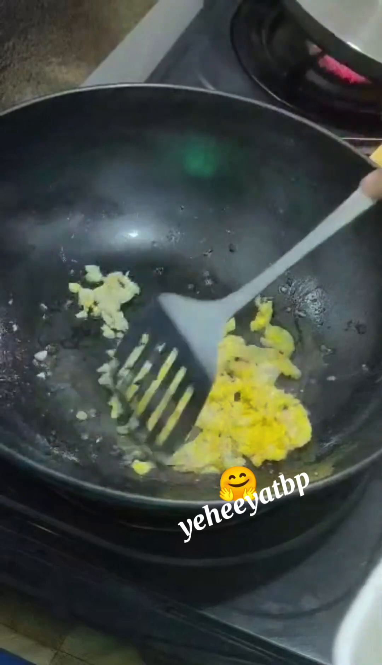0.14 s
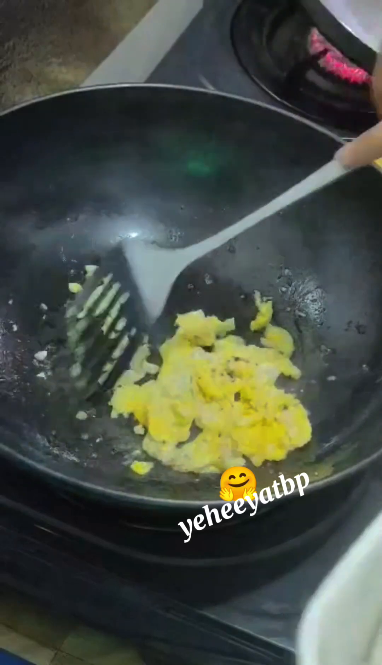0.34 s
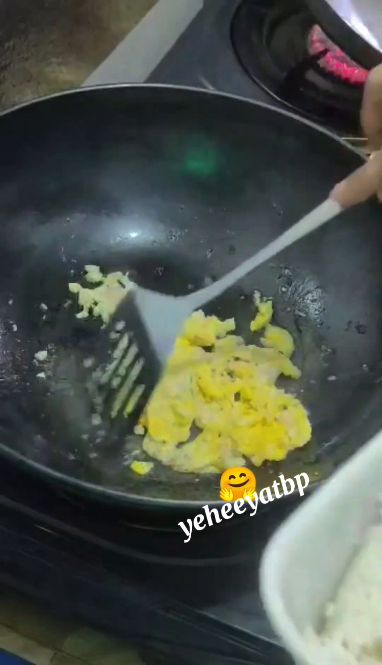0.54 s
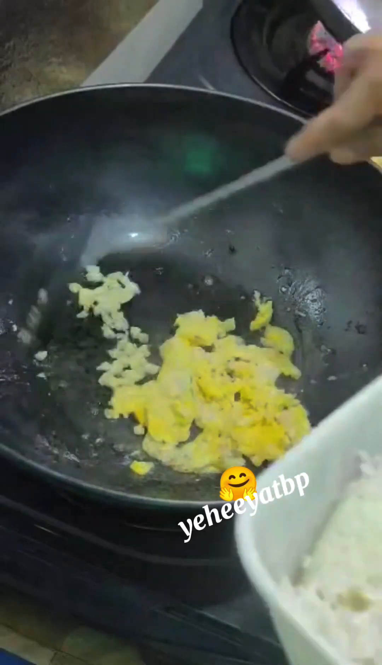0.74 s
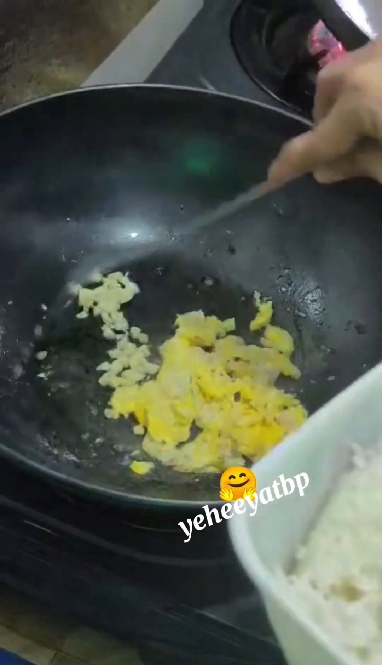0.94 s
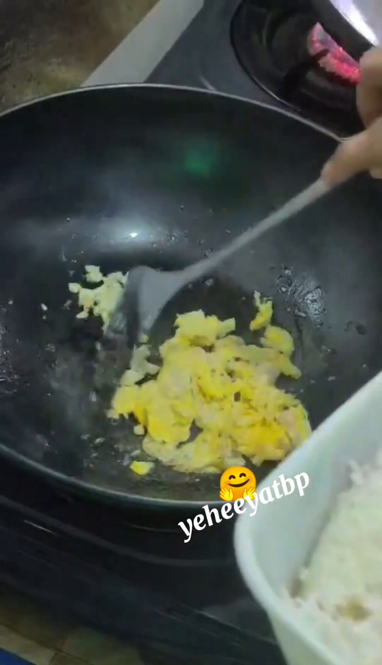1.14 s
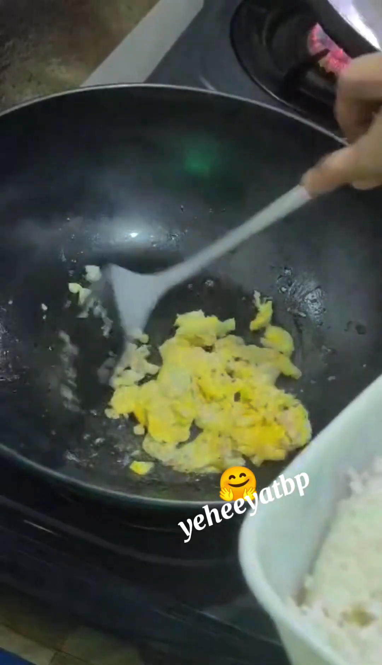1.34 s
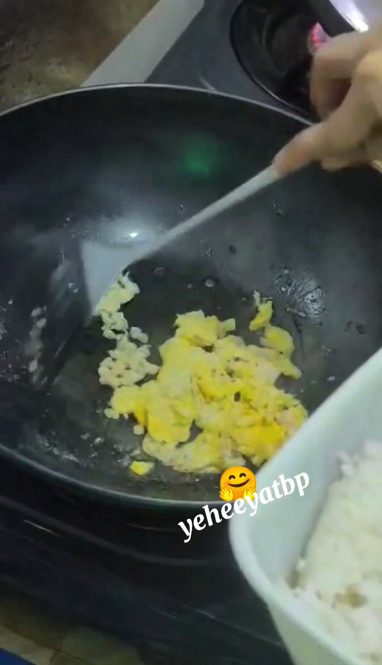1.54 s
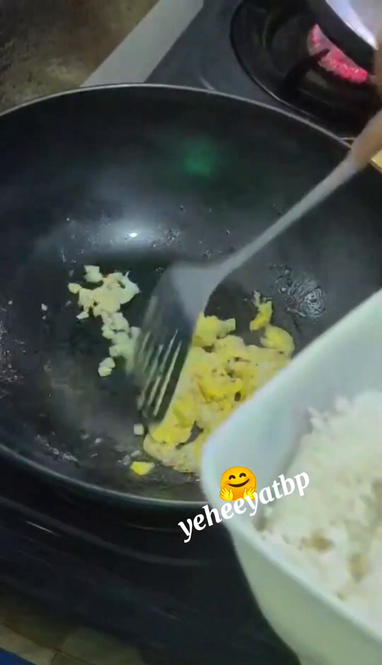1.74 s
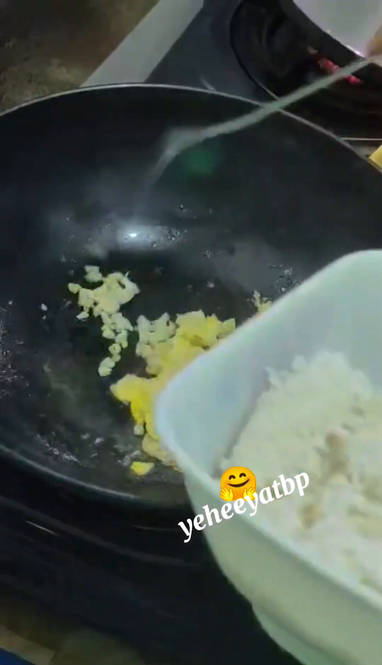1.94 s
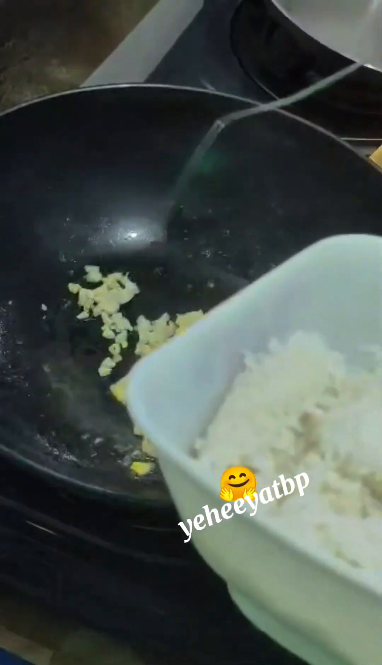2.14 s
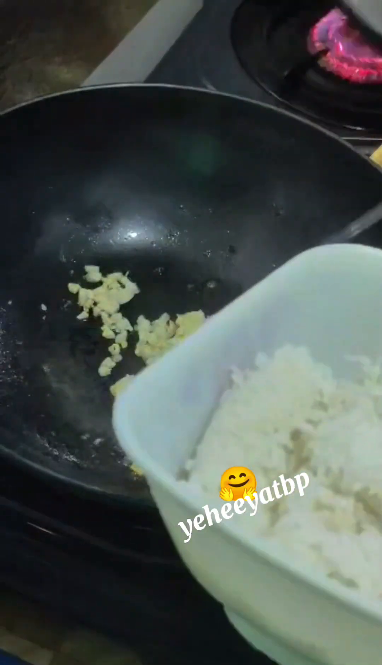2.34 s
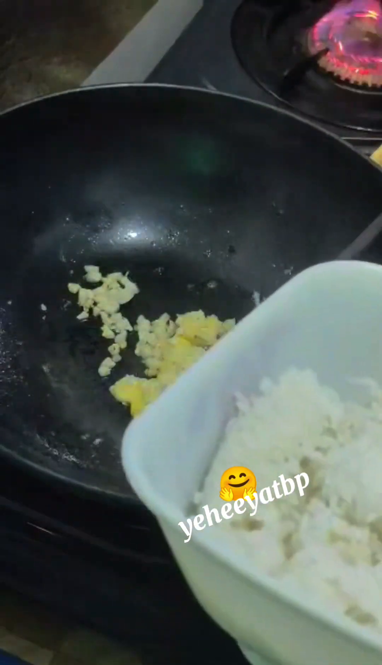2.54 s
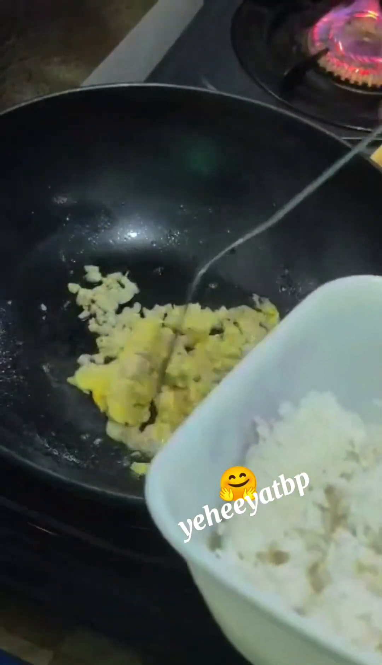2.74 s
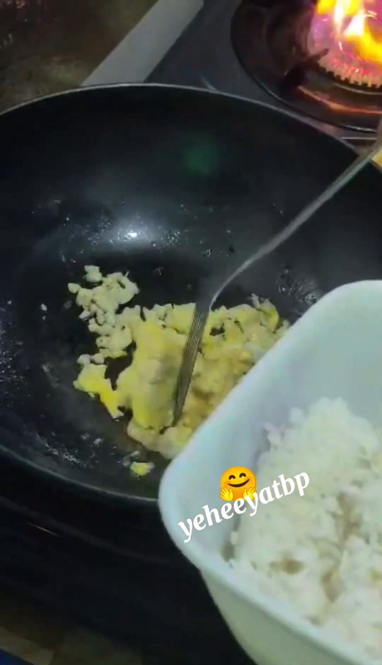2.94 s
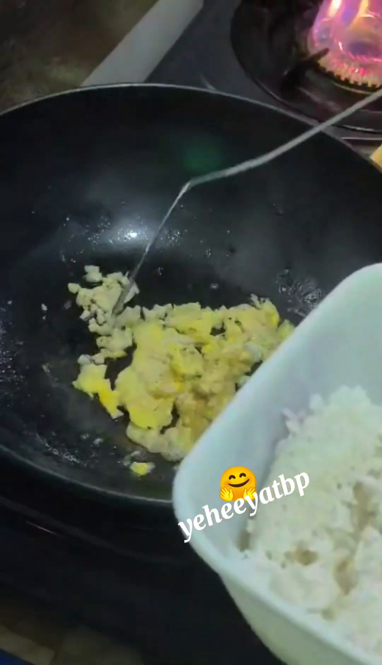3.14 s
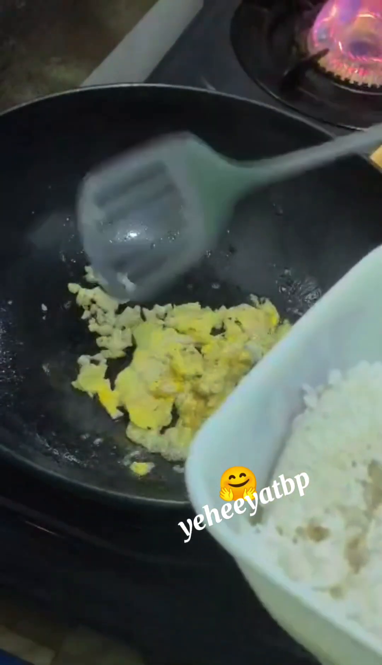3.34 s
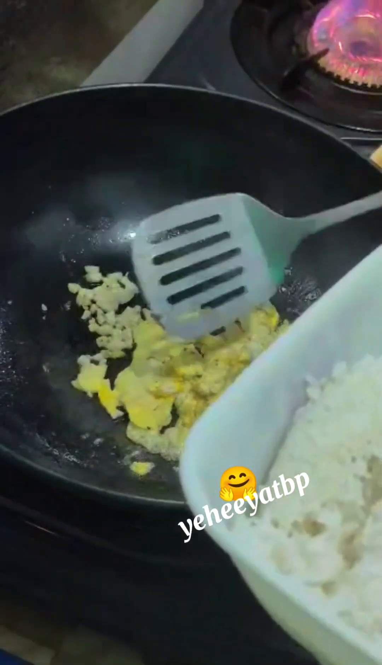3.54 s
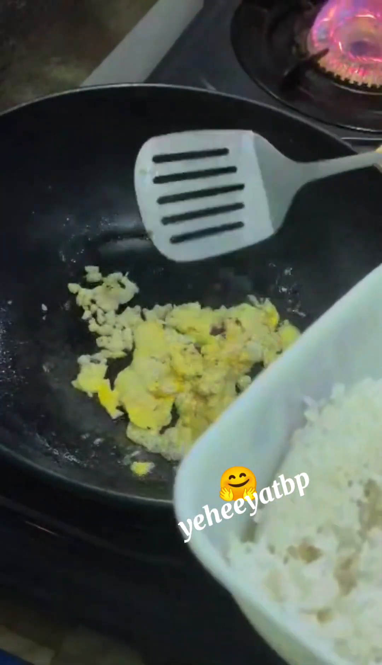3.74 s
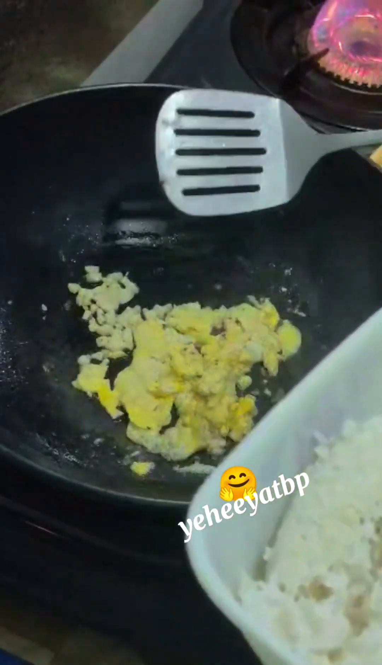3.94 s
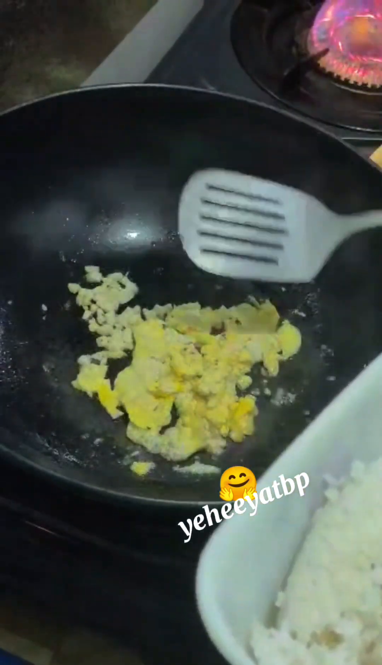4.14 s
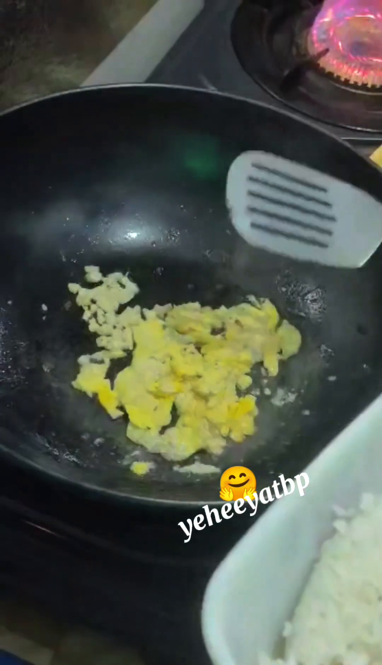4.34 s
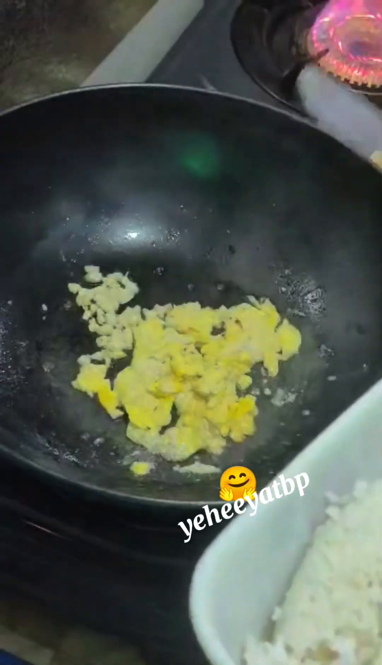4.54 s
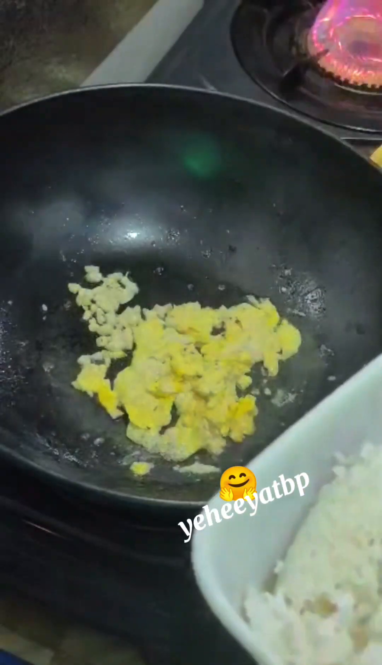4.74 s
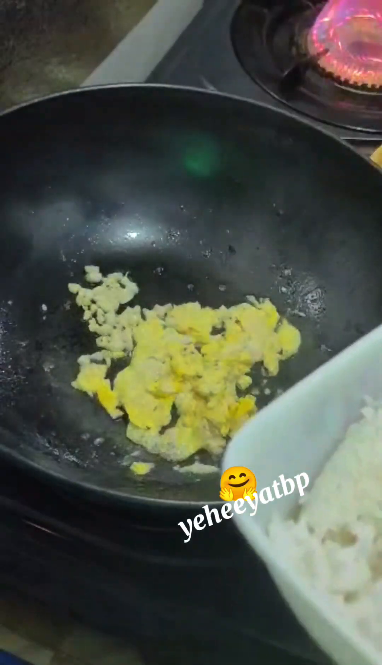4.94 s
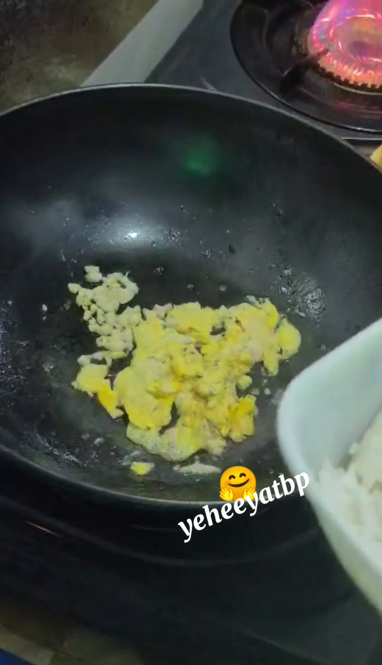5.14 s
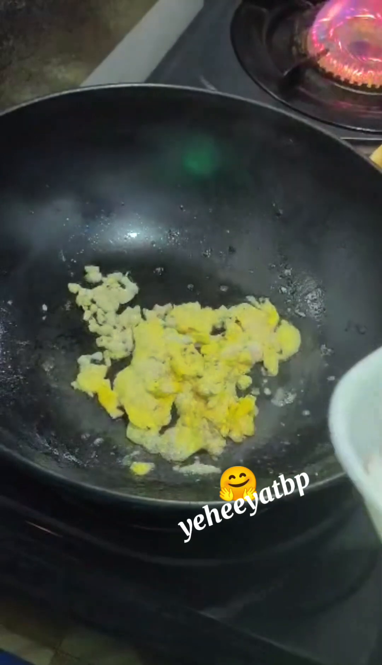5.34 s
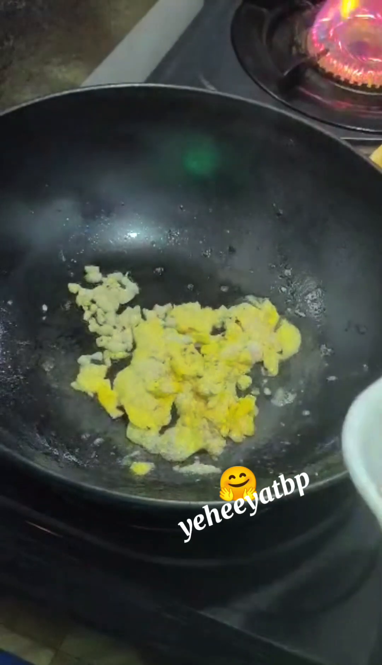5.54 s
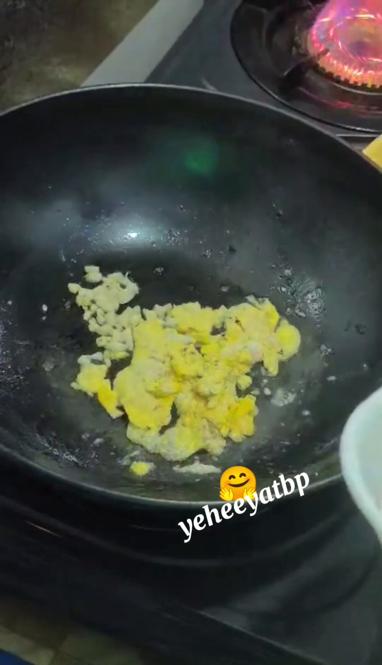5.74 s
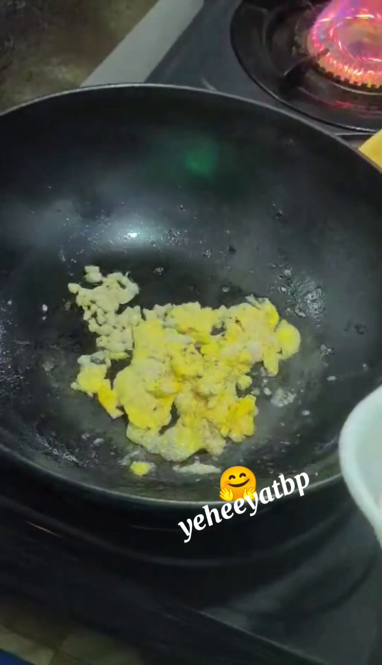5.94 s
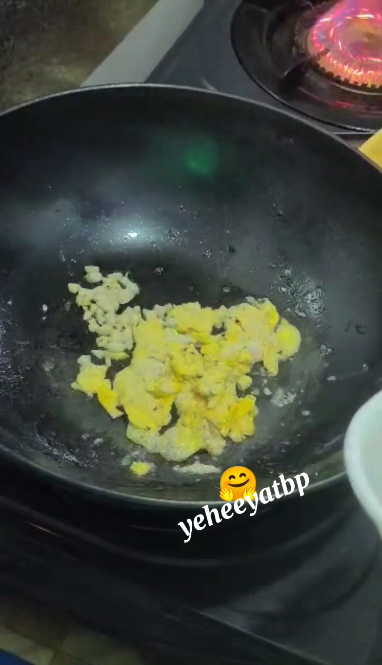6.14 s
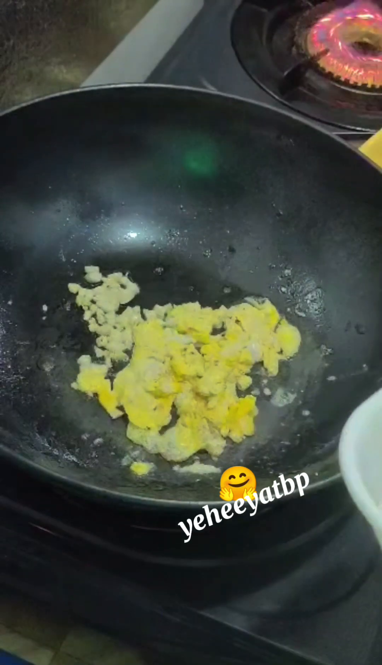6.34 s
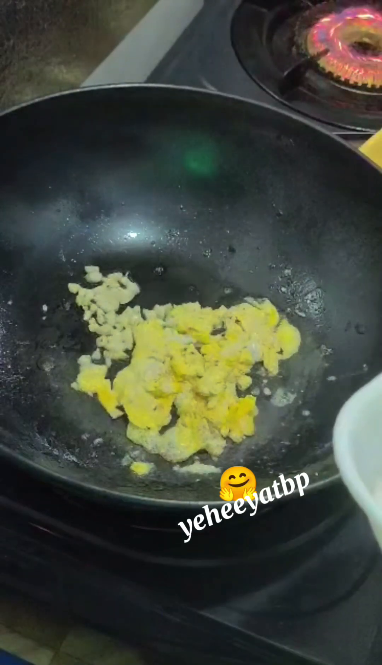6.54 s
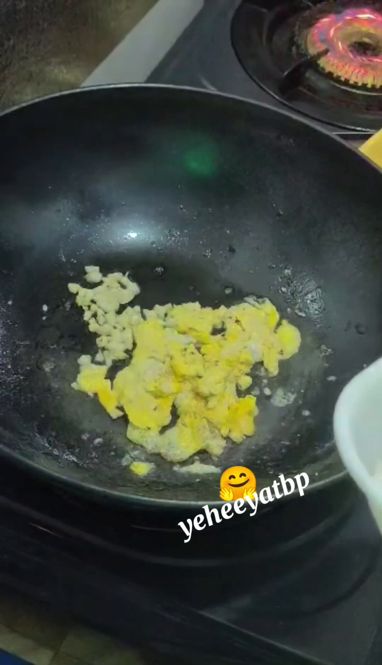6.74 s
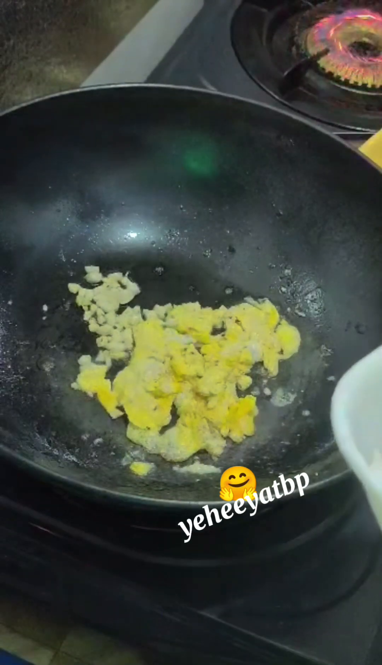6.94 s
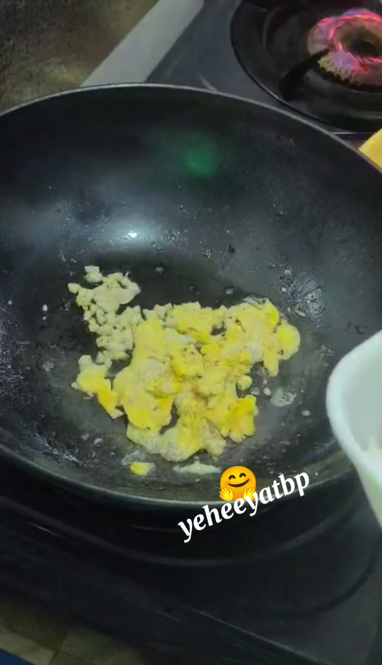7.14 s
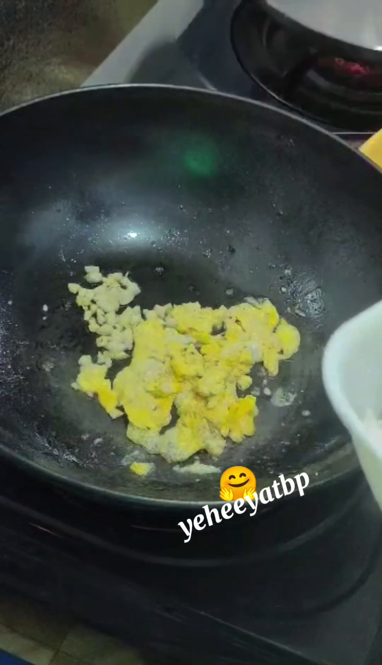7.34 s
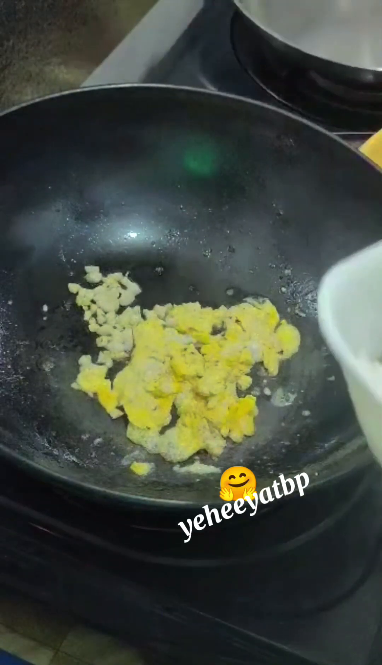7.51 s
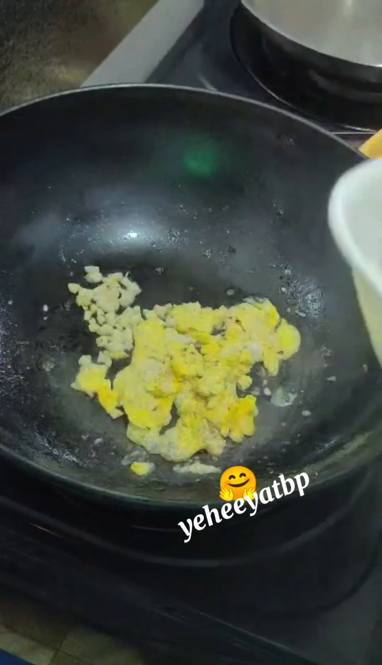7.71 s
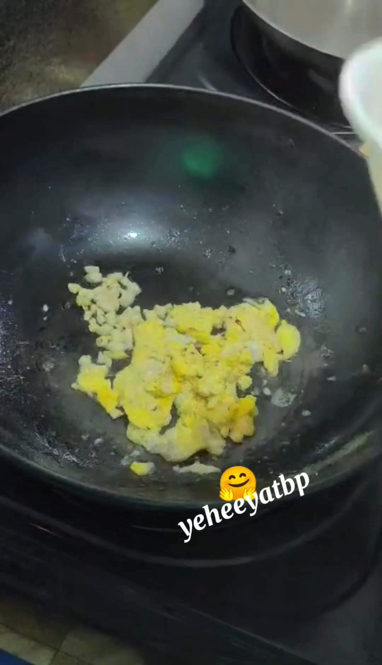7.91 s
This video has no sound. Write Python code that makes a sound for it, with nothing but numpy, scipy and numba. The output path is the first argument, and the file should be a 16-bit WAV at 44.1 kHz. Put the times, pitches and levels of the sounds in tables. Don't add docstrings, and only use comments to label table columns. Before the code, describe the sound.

Irregular metallic blows and scratchy taps in a wok, with frying hiss rising after each knock. After a pause comes a heavy cluster of chops in egg, then tiny brittle cracks with little ringing. A plastic tub is rapped, dragged against and rubbed by jerking fingers with low thumps, ending in quick loud clanks. Dry, close phone sound in a kitchen, background gated and slightly watery.

```python
import sys
import numpy as np
from scipy import signal
from scipy.fft import rfft, irfft
from scipy.io import wavfile
from scipy.ndimage import uniform_filter1d
from numba import njit

SR = 44100
rng = np.random.default_rng(int(sys.argv[2]) if len(sys.argv) > 2 else 0)


def bounce(signal):
    frames = np.transpose(np.atleast_2d(signal))
    limited = np.clip(frames, -1, 1)
    pcm = np.round(limited * 32767).astype(np.int16)
    wavfile.write(sys.argv[1], SR, pcm)


def undo_db(level):
    steps = np.asarray(level, float) / 20
    return 10 ** steps


N = 351469

# pitch_hz, level_db, t60_s
BODY = [(272.5, -12.5, 0.14), (416, -5, 0.083), (445.4, -8.5, 0.36), (520.3, 2, 0.11), (608, -2.5, 0.1),
        (696, -22, 0.045), (757, -14, 0.18), (854, -12.5, 0.16), (1054, -10, 0.19), (1119, -7.5, 0.13)]
# pitch_hz, level_db, t60_s
CLANG = [(1260, -16, 0.15), (1555, -8.5, 0.19), (1965, 5.5, 0.66), (2094, -7, 0.24), (2420, 0, 0.075),
         (2500, -3, 0.21), (3020, -6.5, 0.27), (3660, -11, 0.36), (3635, 13.5, .22), (3734, 5.5, 0.33)]
# pitch_hz, level_db, t60_s
EDGE = [(4410, 5.5, 0.034), (4330, -12.5, 0.19), (4660, -19.5, 0.019), (6376, 2.5, 0.15), (7020, 4, 0.28),
        (7904, -10, 0.15), (7420, -5, 0.25), (7360, 8.5, 0.42), (7540, -13.5, 0.077), (9860, -4.5, 0.076)]
# modes, dense_low_hz, dense_high_hz, dense_level_db, dense_t60_s, unlikeness of the ports
PARTS = ((BODY, 310, 2000, -1.5, 0.36, 1), (CLANG, 1246, 4410, 8.4, 0.19, 1),
         (EDGE, 5250, 9040, 1.2, 0.14, 3.5))
# pitch_hz, density_db (per Hz)
OIL_SPECTRUM = [(530, -46), (900, -7.5), (1340, -14), (1780, 1), (2150, -5), (2470, 3), (2960, 0.5),
                (4300, 2), (5090, -8), (5970, 0.5), (7660, 7), (9610, 1), (11000, -0.5), (12800, 2),
                (13500, -18)]
# pitch_hz, width_hz, level_db
SIMMER_PEAKS = [(534, 73, 9), (610, 27, -6), (1136, 220, -9.5)]
# pitch_hz, width_hz, level_db
TUB_PEAKS = [(160.2, 21, 5.5), (250, 40, 5.5), (300.5, 53, 0.5), (419.5, 330, -19), (760, 370, -31)]
# pitch_hz, width_hz, level_db
DRAG_PEAKS = [(490, 20, -10), (510, 87, 0.5), (1025, 90, -2.5), (1063, 50, 3.5), (1860, 70, -8),
              (2530, 120, -9.5), (3060, 160, -7)]
# time_s, sizzle_db (oil), spit_db (wet egg)
HEAT = [(0, -59, -60), (.3, -50.5, -59.5), (1.3, -52, -65), (2.02, -50.5, -64), (2.1, -63.5, -81.5),
        (2.515, -53, -76.5), (2.57, -47, -58), (3.3, -49.5, -58.5), (3.75, -48.5, -57.5),
        (4.05, -52, -68.5), (4.22, -50.5, -59), (4.57, -55, -70), (4.8, -62.5, -72), (5.235, -56, -70.5),
        (5.32, -46.5, -56), (5.63, -65.5, -72.5), (6.5, -60.5, -72), (7.55, -62.5, -78)]
# start_s, hold_s, rumble_db, thud_db
GRIPS = [(0.093, 0.11, -47.5, -76), (0.584, 0.057, -55, -56), (0.858, 0.034, -81, -47),
         (1.03, 0.042, -56.5, -80), (1.23, 0.57, -73, -78), (2.025, 0.042, -63, -80.5),
         (2.687, 0.049, -68.5, -95), (2.93, 0.035, -51.5, -56.5), (3.67, 0.02, -91.5, -66.5),
         (4.041, 0.034, -57, -62), (4.36, 0.041, -80, -52.5), (5.304, 0.087, -52, -44.5),
         (5.816, 0.068, -62, -88), (6.466, 0.33, -63, -67), (6.932, 0.26, -60.5, -60),
         (7.274, 0.13, -58.5, -64), (7.487, 0.02, -83, -70), (7.623, 0.16, -41.5, -50.5),
         (7.78, .3, -63, -69)]
# start_s, peak_db
SLIPS = [(6.456, -47), (6.525, -42), (6.569, -52), (6.619, -41.5), (6.679, -49), (6.723, -43), (6.769, -49),
         (6.826, -42), (6.869, -44), (6.919, -48), (6.961, -38.5), (7.004, -42), (7.05, -55),
         (7.097, -35.5), (7.193, -40), (7.272, -40), (7.349, -48), (7.419, -44.5), (7.491, -33.5)]
# start_s, hold_s, level_db
DRAGS = [
    (4.858, .045, -63),
    (5.886, 0.01, -65),
    (6, 0.2, -56),
    (6.3, .015, -51.5),
]
# start_s, pitch_hz, level_db, t60_s
HUMS = [(0.069, 285, -47, 1.9), (0.069, 460, -37, .28), (0.069, 1149, -27.5, 0.14), (0.071, 1304, -34, .15),
        (0.076, 517, -34, 0.22), (.548, 544, -30, 0.19), (0.546, 300, -34.5, 0.26),
        (0.699, 1300, -33, 0.083), (0.872, 272, -37.5, 0.39), (.87, 546, -36.5, 0.19),
        (.87, 590, -45.5, .9), (0.969, 429, -37.5, 0.37), (1.25, 850, -47.5, 0.3), (1.36, 619, -53, 0.69),
        (2.003, 580, -54, 0.19), (2.173, 606, -46, 0.22), (2.173, 730, -58, 0.18), (5.06, 640, -57, 0.29),
        (2.53, 263.5, -46.5, 0.9), (2.935, 409, -18.5, 0.35), (2.97, 603, -28.5, 0.2),
        (2.935, 711, -33.5, 0.25), (2.94, 775, -28.5, 0.3), (2.94, 1060, -31, .3), (.548, 2254, -28, 0.22),
        (.548, 2373, -30, .15), (.548, 3732, -23.5, 0.18), (.868, 4456, -24.5, 0.12),
        (.07, 3785, -31, 0.15), (2.94, 1475, -32.5, 0.24), (.868, 4720, -27, 0.11), (.868, 3800, -28, .1),
        (3.335, 840, -52, 0.13), (6.0, 1060, -47, 0.22), (6.05, 1090, -45, 0.23), (6.05, 490, -45, 0.23),
        (6.29, 1050, -51, .15), (0.369, 1080, -47, 0.086), (7.787, 2020, -31, .12), (7.787, 3550, -33, .15),
        (7.652, 3800, -30, .15), (6.68, 1260, -53.5, 0.11), (6.1, 1800, -46.5, 0.1),
        (6.68, 2116, -56, 0.15), (6.689, 453, -58, 0.26)]
# start_s, peak_db
TICKS = [(.0152, -31), (.524, -28), (1.441, -27), (1.603, -32), (5.371, -36), (6.432, -38), (6.551, -38),
         (6.926, -36), (.375, -32), (.403, -31), (.4094, -28), (1.1343, -30), (1.486, -22), (1.5554, -25),
         (1.569, -23), (1.7963, -20), (1.811, -30), (1.619, -31), (1.197, -36), (1.208, -36), (1.8427, -22),
         (1.992, -34), (5.7195, -26), (5.8112, -30), (1.8194, -33), (2.6544, -22), (5.247, -28),
         (6.3395, -33), (6.3674, -26), (6.4911, -25), (6.521, -26), (6.9075, -35), (6.982, -33),
         (6.987, -36), (7.476, -35), (7.481, -37)]
# start_s, peak_db
CRUMBS = [(2.359, -38), (3.4506, -27), (3.469, -26), (3.3332, -35), (3.5314, -28), (3.5362, -23),
          (3.5623, -27), (3.6579, -32), (3.785, -34), (3.8851, -25), (3.8994, -27), (3.9818, -29),
          (4.1131, -20), (4.1174, -23), (4.1869, -31), (4.1907, -28), (4.2277, -30), (4.2312, -31),
          (3.8386, -33), (4.2145, -34), (4.7595, -37), (4.243, -33), (4.2575, -27), (4.309, -25),
          (4.3609, -32), (4.4931, -36), (4.5321, -32), (4.0476, -35), (4.7066, -39)]
# start_s, peak_db
SNAPS = [
    (.0677, -11),
    (5.7195, -22),
    (5.7245, -26),
    (5.8112, -27),
    (2.5282, -22),
    (5.289, -31),
]
# start_s, clang_peak_db, body_db, edge_db, contact_ms
BLOWS = [(0.067, -16.5, -18, -17, 24), (0.135, -30.5, -37, -32, 30.5), (.545, -9.5, -21, -8.5, 21.7),
         (0.696, -34, -42, -33.5, 7.2), (0.8652, -15, -16, -14, 14.3), (.952, -31, -36.5, -27, 27),
         (.975, -27.5, -29, -22, 18), (1.239, -42.5, -48.5, -48, 62), (1.427, -29.5, -39.5, -30.5, 27.8),
         (1.617, -43, -37.5, -41, 15.3), (2.0031, -55, -53.5, -38.5, 26), (2.358, -62.5, -82, -44.5, 30),
         (2.527, -30, -25.5, -21, 27.3), (2.5851, -20.5, -27.5, -19.5, 32.6), (2.6185, -27, -45, -16, 10.2)]
# start_s, clang_peak_db, body_db, edge_db, contact_ms
CHOPS = [
    (2.9248, -14, -17.5, -25.5, 25),
    (2.947, -25.5, -20.5, -30, 26.7),
    (2.999, -28.5, -25.5, -29.5, 26),
    (3.0816, -25.5, -38.5, -28.5, 25.5),
    (3.8374, -32, -48, -40, 24),
]
# start_s, clang_peak_db, body_db, edge_db, contact_ms
RAPS = [(5.2443, -30.5, -34, -24.5, 2.7), (5.662, -38, -40, -35, 10), (5.678, -36, -44.5, -35, 15),
        (5.7185, -31, -37.5, -27.5, 4), (5.809, -36, -41, -35, 6.3), (5.863, -27.5, -32.5, -38.5, 15),
        (6.012, -39, -40, -86, 22), (7.614, -30, -20.5, -46, 7.4), (7.631, -32.5, -22, -44, 4.5),
        (7.651, -15.5, -23, -17, 16), (7.7414, -38.5, -27.5, -37, 5.1), (7.787, -19.5, -24.5, -21.5, 4.7),
        (7.696, -27, -32, -27, 8), (7.811, -27.5, -37, -25.5, 6), (7.829, -29, -36, -28, 12),
        (7.838, -20, -31, -22, 8.3)]
# start_s, clang_peak_db, edge_db, contact_ms
TAPS = [(0.0112, -34.5, -32.5, 19), (0.347, -62, -38, 60), (0.409, -30.5, -30.5, 27.7),
        (0.513, -24, -25, 17), (0.7232, -36, -37, 4.2), (0.826, -27.5, -41, 24), (1.121, -72, -33.5, 6.4),
        (1.487, -27.5, -25.5, 9.5), (1.556, -25, -25, 29), (1.801, -35, -32, 27), (1.853, -28, -26, 16.6),
        (.462, -39, -45, 15), (3.222, -41, -46, 12), (3.335, -45, -46, 12), (7.606, -46, -43, 5),
        (7.918, -44, -36, 6), (1.843, -22.5, -21.5, 4.3), (2.6532, -44, -36, 57), (2.706, -26, -28, 29.2),
        (3.4474, -33.5, -32.5, 10), (3.531, -32, -34, 5.4), (3.8807, -34, -36, 20), (4.112, -78, -38, 13),
        (4.244, -60, -32.5, 19), (4.304, -39.5, -39.5, 27), (4.36, -68, -40.5, 23),
        (4.5352, -50, -42.5, 10), (4.741, -39, -40.5, 35), (5.459, -39, -36, 44), (6.183, -44, -41.5, 29),
        (6.366, -40.5, -34.5, 30), (6.4902, -28.5, -31, 27.4), (6.8641, -41.5, -39.5, 12),
        (6.981, -75, -40, 11), (7.28, -41.5, -39, 28), (7.473, -60, -38.5, 28.5)]
# start_s, body_db, clang_db (relative to body), contact_ms
BUMPS = [
    (1.6783, -39.5, -34, 16.2),
    (2.171, -44, -30, 32),
    (4.034, -43.5, -13, 1.7),
    (5.067, -49, -12, 26.6),
    (6.061, -41.5, -26, 10.6),
    (6.308, -57, 8, 39),
    (6.678, -53.5, -2.5, 40),
]
# pitch_hz, level_db
GATE = [(0, -30), (700, -7), (1300, 0), (4200, 0), (4800, 2), (5150, 8), (5500, 1), (6000, -2), (7500, -6),
        (9000, 1), (10600, 9), (12000, 7)]

LEFT_LAG, TUB_LAG = 16, 1
TUB_FROM_S = 5.6
TOP_HZ = 13200


def level(x):
    return x / np.sqrt(np.mean(x ** 2) + 1e-30)


def curves(table):
    s, *columns = np.transpose(table)
    return [np.interp(np.arange(N) / SR, s, c) for c in columns]


def walk(rate):
    k = int(SR / rate)
    held = np.repeat(rng.standard_normal(int(100 * N / SR)), k)[:N]
    return 1.31 * uniform_filter1d(uniform_filter1d(held, k), k)


def grit(n, spike_db):
    spikes = np.minimum(rng.exponential(size=n), 7)
    return level(rng.standard_normal(n) * undo_db(spike_db * spikes))


def ports(n, unlike, lag):
    shared = rng.standard_normal(n)
    return np.array([np.roll(shared, int(lag)), shared]) + unlike * rng.standard_normal((2, n))


def strokes(start, hold, db, rise_db_s, fall_db_s, rest_db):
    t, out = np.arange(0, N + 64, 64) / SR, 0
    for s, h, d in zip(start, hold, db):
        before, after = np.maximum(s - t, 0), np.maximum(t - s - h, 0)
        out = out + undo_db(d - rise_db_s * before - fall_db_s * after)
    return np.interp(np.arange(N) / SR, t, 20 * np.log10(out + undo_db(rest_db)))


def opened(rest_db, start, knock_db, rise_s, slope, top_db):
    t = np.arange(0, N + 64, 64) / SR
    age = np.maximum(t - start[:, None], 0) / rise_s
    peak = undo_db(top_db + slope * (knock_db[:, None] + 19))
    swell = np.max(peak * (age * np.exp(1 - age)) ** 2, axis=0)
    return 20 * np.log10(undo_db(rest_db) + np.interp(np.arange(N) / SR, t, swell))


@njit
def svf(x, hz, width):
    y, b, l = np.empty(len(x)), 0., 0.
    g, k = np.tan(np.pi * hz / SR), width / hz
    for i in range(len(x)):
        v = (b + g * (x[i] - l)) / (1 + g * (g + k))
        b, l, y[i] = 2 * v - b, l + 2 * g * v, k * v
    return y


def walls(force, peaks):
    out = 0
    for hz, width, db in peaks:
        hz, width = float(hz), float(width)
        out = out + undo_db(db) * np.array([svf(svf(c, hz, width), hz, 2 * width) for c in force])
    return level(out)


@njit
def ring(x, pole, left, right):
    out, z = np.zeros((2, len(x))), np.zeros(len(pole), np.complex128)
    for i in range(len(x)):
        for k in range(len(pole)):
            z[k] = z[k] * pole[k] + x[i]
            out[0, i] += (left[k] * z[k]).imag
            out[1, i] += (right[k] * z[k]).imag
    return out


def struck(force, modes, share, unlike, lag, spot_db=3):
    hz, db, t60 = np.transpose(modes)
    t60 = share * np.minimum(t60, np.interp(hz, (1000, 1300, 8000), (.45, .22, .11)))
    spot = rng.standard_normal((4, len(hz)))
    detuned = hz * (1 + np.where(hz > 3000, .015, .004) * spot[0])
    pole = np.exp(2j * np.pi * detuned / SR - np.log(1000) / (t60 * SR))
    right = undo_db(np.minimum(db, 0) + spot_db * spot[1]) * np.exp(2j * spot[2])
    scatter = unlike * np.minimum(hz / 700, 1) * spot[3]
    left = right * np.exp(-2j * np.pi * hz * lag / SR + 1j * scatter)
    return ring(force + 1e-18, pole, left, right)


def frying(sizzle_db, crackle_db):
    hz_table, db_table = np.transpose(OIL_SPECTRUM)
    pops = np.clip(grit(N, 7), -9, 9) * undo_db(3 * walk(90))
    near = np.array([np.roll(pops, LEFT_LAG), pops])
    crackle, sizzle = 0, 0
    swell = np.clip(.4 * walk(22) + .8 * walk(70), -2, .9)
    for hz in 1000 * 2 ** np.arange(0, 3.75, .2):
        both = 0.77 * near + rng.standard_normal((2, N))
        band = np.array([svf(svf(c, hz, hz / 5), hz, hz / 5) for c in both])
        db = np.interp(np.log(hz), np.log(hz_table), db_table)
        db = db + (2.6 if hz < 9000 else 3.2) * swell + 2.3 * np.clip(walk(25), -3, 1.6)
        lean = 3 * np.clip((hz - 9000) / 3000, -.5, 1)
        band = band * undo_db(db + np.array([[lean], [-lean]]))
        if hz > 4500:
            sizzle = sizzle + band
        else:
            crackle = crackle + band
    top = signal.ellip(8, .2, 60, TOP_HZ, fs=SR, output="sos")
    return signal.sosfilt(top, level(crackle) * undo_db(crackle_db) + level(sizzle) * undo_db(sizzle_db))


def simmering(spit_db):
    bubbles = ports(N, .6, 0) * undo_db(4.5 * walk(30))
    return walls(bubbles, SIMMER_PEAKS) * undo_db(-74 + 0.94 * (spit_db + 53.0))


def rubbing(rub_db):
    force = grit(N, 2) * undo_db(3 * walk(20))
    return level(struck(force, BODY[1:], 0.11, 1.0, 0, spot_db=-2.5)) * undo_db(rub_db)


def tub(rumble_db, thud_db):
    s, db = np.transpose(SLIPS)
    hold_s = np.full(len(s), 0.0054)
    slip_db = strokes(s + 0.0061, hold_s, db - 9, rise_db_s=1201, fall_db_s=421, rest_db=-120)
    slips = ports(N, .25, 0) * undo_db(1.5 * walk(40))
    low = signal.butter(2, (30, 95), "band", fs=SR, output="sos")
    thud = signal.sosfilt(low, ports(N, .4, 0))
    return walls(slips, TUB_PEAKS) * (undo_db(rumble_db) + undo_db(slip_db)) + level(thud) * undo_db(thud_db - 8.0)


def dragging():
    stroke_db = strokes(*np.transpose(DRAGS), rise_db_s=308, fall_db_s=259, rest_db=-120)
    jerks = ports(N, 0.41, 0) * undo_db(4.4 * walk(59))
    return walls(jerks, DRAG_PEAKS) * undo_db(stroke_db)


def humming():
    t, out = np.arange(N) / SR, np.zeros(N)
    tremble = undo_db(2.2 * walk(45))
    for s, hz, db, t60 in HUMS:
        start = int(s * SR)
        age = t[:min(int(1.5 * t60 * SR), N - start)]
        envelope = (1 - np.exp(-age / .004)) * 1000 ** (-age / t60)
        out[start:start + len(age)] += undo_db(db) * envelope * np.sin(2 * np.pi * hz * age)
    return signal.sosfilt(signal.butter(4, 200, "high", fs=SR, output="sos"), out * tremble)


def ticks():
    t = np.arange(1024) / SR
    out = np.zeros((2, N))
    # events, low_hz, high_hz, ring_db, pan_db (the lifted blade sings a little to the right)
    kinds = ((TICKS, 1300, 10500, 5, 0), (CRUMBS, 3800, 10500, 14, -2), (SNAPS, 700, 4200, -40, 0))
    for table, low_hz, high_hz, ring_db, pan_db in kinds:
        band = signal.butter(3, (low_hz, high_hz), "band", fs=SR, output="sos")
        lean = undo_db(np.array([[pan_db], [-pan_db]]) / 2)
        for s, db in table:
            rough = uniform_filter1d(rng.standard_normal(len(t)), size=40) * 6
            tail = np.exp(-t / .006) * undo_db(4 * rough)
            crack = ports(len(t), .6, LEFT_LAG) * (np.exp(-t / .0007) + .35 * tail)
            crack = signal.sosfilt(band, crack)
            crack = crack + undo_db(ring_db) * np.array([svf(c, 7530., 2200.) for c in crack])
            peak = abs(crack.mean(axis=0)).max()
            start = int(s * SR)
            out[:, start:start + len(t)] += crack * lean * undo_db(db) / peak
    return out


def contacts():
    rows = []
    for table, share in ((BLOWS, 0.48), (CHOPS, 0.41), (RAPS, 0.96)):
        rows += [(*row, share) for row in table]
    rows += [(s, clang, clang - 25.5, edge, ms, 0.19) for s, clang, edge, ms in TAPS]
    rows += [(s, body + under, body, body - 24, ms, 0.62) for s, body, under, ms in BUMPS]
    return np.array(sorted(rows)) * [1, 1, 1, 1, 1e-3, 1]


def knocks():
    t = np.arange(1 << 14) / SR
    out = np.zeros((2, N + len(t)))
    fade = np.clip((t[-1] - t) / 0.11, 0, 1)
    bands = [signal.butter(3, (p[1], p[2]), "band", fs=SR, output="sos") for p in PARTS]
    lag_shares = (.25, 1, 1)
    last_s, last_db = -1, -99
    for s, clang_db, body_db, edge_db, contact, share in contacts():
        contact, share = max(contact, 3e-4), np.clip(share, .05, 1.2)
        rebound = s - last_s < .11 and clang_db < last_db
        skid = rebound or contact > .028 and clang_db < -25
        last_s, last_db = s, clang_db
        rise_s = (.3 if skid else 0.025) * contact
        rattle = (1 - np.exp(-t / rise_s)) * np.exp(-t / contact)
        tick = (.3 if skid else .9) * np.exp(-t / 0.0013)
        hard = grit(len(t), 3.3) * (rattle + tick)
        push = int(np.clip(1.5 * (body_db - clang_db), 1, 40))
        soft = uniform_filter1d(uniform_filter1d(hard, push), push)
        late = LEFT_LAG if s < TUB_FROM_S else TUB_LAG
        start = max(int((s - .001) * SR), 0)
        forces = soft, hard, hard
        levels_db = body_db - 6.0, clang_db - 10.5, edge_db - 8.5
        for settings, force, band, db, lag_share in zip(PARTS, forces, bands, levels_db, lag_shares):
            modes, _, _, dense_db, t60, unlike = settings
            lag = lag_share * late
            dense = signal.sosfilt(band, ports(len(t), unlike, lag)) * 1000 ** (-t / (share * t60))
            dense = irfft(rfft(dense, 2 * len(t)) * rfft(force, 2 * len(t)))[:, :len(t)]
            part = level(struck(force, modes, share, unlike, lag)) + undo_db(dense_db) * level(dense)
            onset = np.sqrt(np.mean(part[:, :SR // 50] ** 2))
            out[:, start:start + len(t)] += part * fade * undo_db(db) / onset
    return signal.sosfilt(signal.butter(3, (140, 9200), "band", fs=SR, output="sos"), out[:, :N])


def scene():
    heat_db, spit_db = curves(HEAT)
    start, clang_db, body_db, edge_db = contacts().T[:4]
    sizzle_db = opened(heat_db, start, edge_db, rise_s=0.046, slope=0.58, top_db=-48.5)
    crackle_db = opened(spit_db, start, clang_db, rise_s=0.045, slope=0.76, top_db=-53)
    rub_db = opened(-79.5, start, body_db, rise_s=0.073, slope=0.99, top_db=-45)
    s, hold, rumble_db, thud_db = np.transpose(GRIPS)
    rumble_db = strokes(s, hold, rumble_db, rise_db_s=390, fall_db_s=119, rest_db=-86)
    thud_db = strokes(s, hold, thud_db, rise_db_s=390, fall_db_s=79, rest_db=-86)
    pan = frying(sizzle_db + 4.5, crackle_db + 9.0) + simmering(spit_db + 8.5) + rubbing(rub_db)
    plastic = tub(rumble_db, thud_db) + dragging()
    return pan + plastic + humming() + ticks() + knocks()


def drop_weak_lines(x, size=1024):
    n, k = np.arange(2 * size), np.arange(size)
    line_hz = k * SR / (2 * size)
    window = np.sin(np.pi * (n + .5) / (2 * size))[:, None]
    basis = window * np.cos(np.pi / size * np.outer(n + .5 + size / 2, k + .5))
    x = np.pad(x, ((0, 0), (size, 2 * size - N % size)))
    halves = x.reshape(2, -1, size)
    lines = np.concatenate([halves[:, :-1], halves[:, 1:]], axis=2) @ basis
    power = uniform_filter1d(np.mean(lines ** 2, axis=0), size=16, axis=1)
    mask = np.exp(uniform_filter1d(np.log(power + 1e-20), size=120, axis=1) / 2)
    patch = uniform_filter1d(rng.standard_normal((len(mask), size // 16)), size=4, axis=0)
    gate_db = np.interp(line_hz, *np.transpose(GATE)) + 9 * np.repeat(patch, 16, axis=1)
    step = mask * undo_db(gate_db)
    blocks = np.mean(np.diff(x, prepend=0).reshape(2, -1, 8, size // 8) ** 2, axis=(0, 3))
    sudden = blocks.max(axis=1) > 5 * np.median(blocks, axis=1)
    energy = np.sum(halves ** 2, axis=(0, 2))
    sudden[1:] |= energy[1:] > 8 * energy[:-1]
    calm = ~(sudden[1:] | sudden[:-1])
    floor = np.mean(power, axis=1, keepdims=True) * undo_db(2 * -14)
    buried = (power < floor) & (line_hz > 9000)
    passed = (abs(lines) > step) & (line_hz < TOP_HZ)
    lines = lines * (passed | ~calm[:, None]) * ~buried
    frames = lines @ basis.T * 2 / size
    return (frames[:, :-1, size:] + frames[:, 1:, :size]).reshape(2, -1)[:, :N]


def roll_off(x):
    return signal.sosfilt(signal.butter(12, 14430, fs=SR, output="sos"), x)


def record(dry):
    soft_top = signal.butter(2, 1.1 * TOP_HZ, fs=SR, output="sos")
    mix = signal.sosfilt(soft_top, drop_weak_lines(dry)) * undo_db(np.array([[.35], [-.35]]))
    return roll_off(mix)


dry = scene()
out = record(dry)
bounce(out)
```